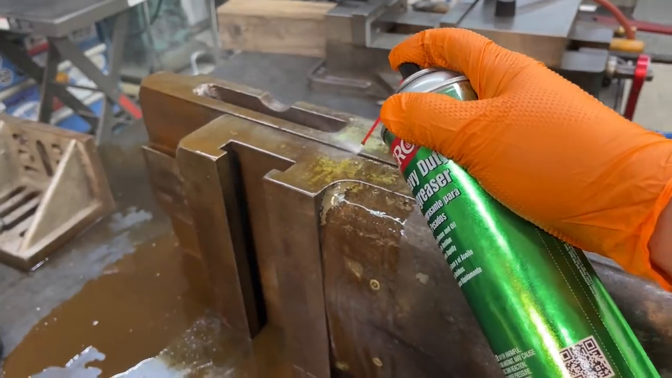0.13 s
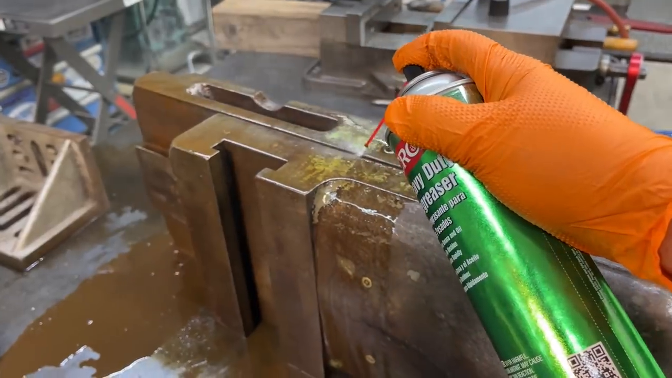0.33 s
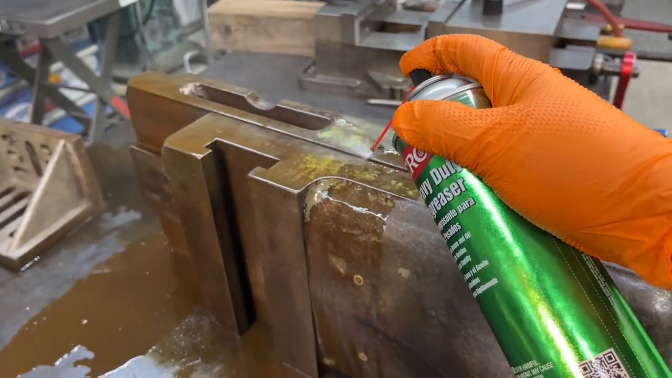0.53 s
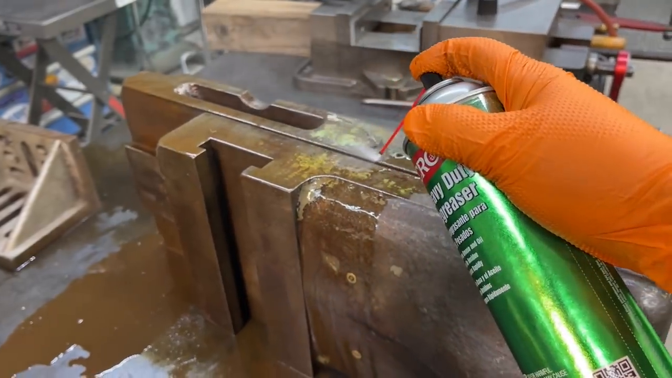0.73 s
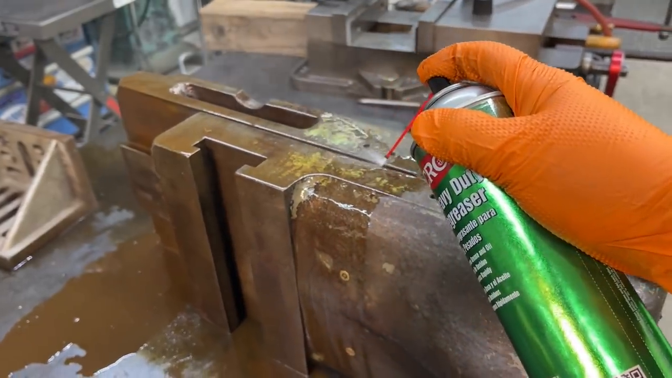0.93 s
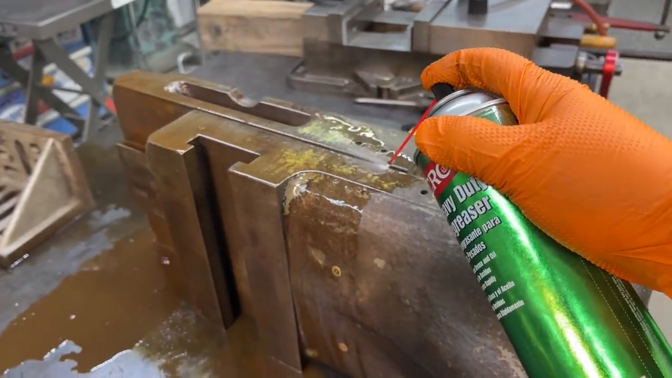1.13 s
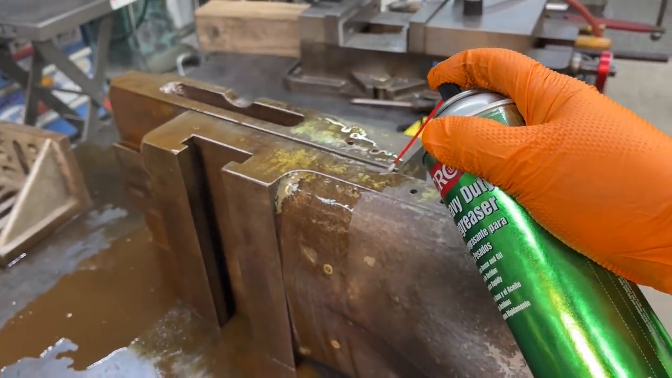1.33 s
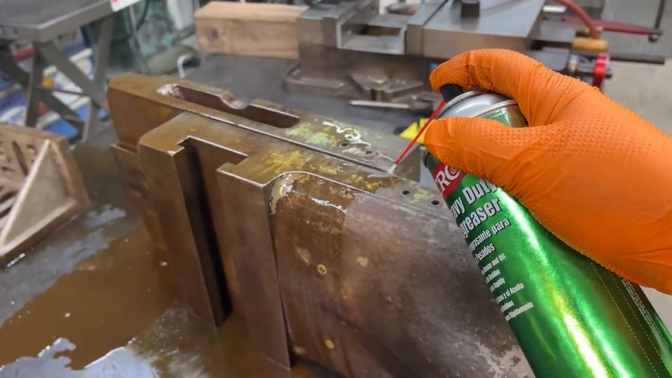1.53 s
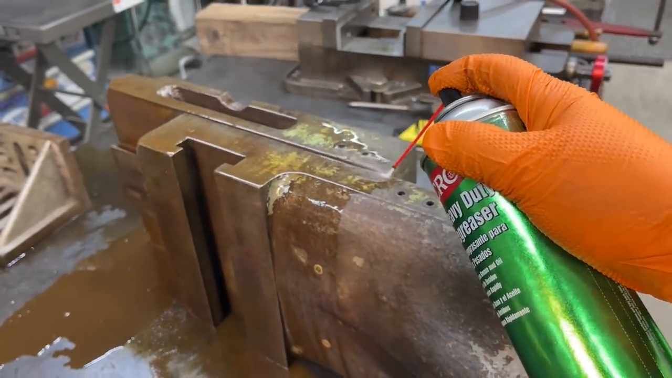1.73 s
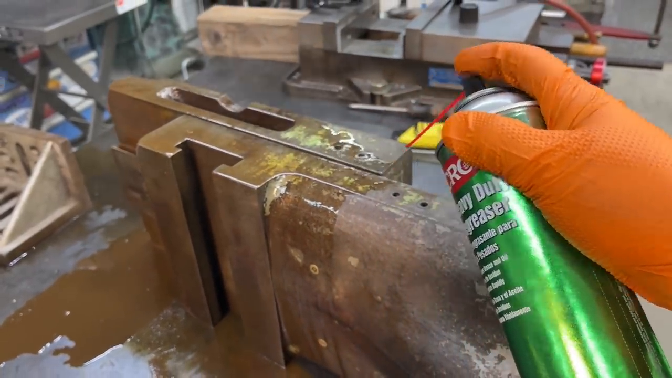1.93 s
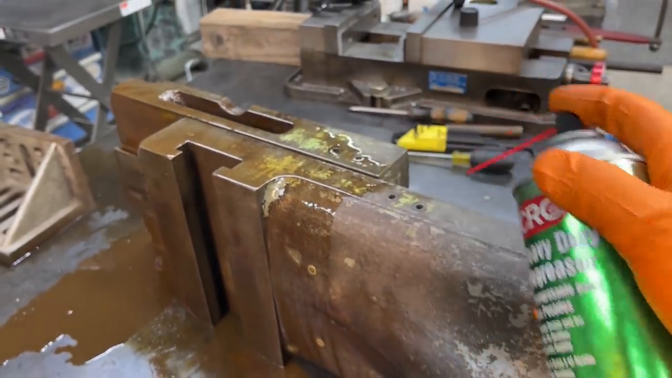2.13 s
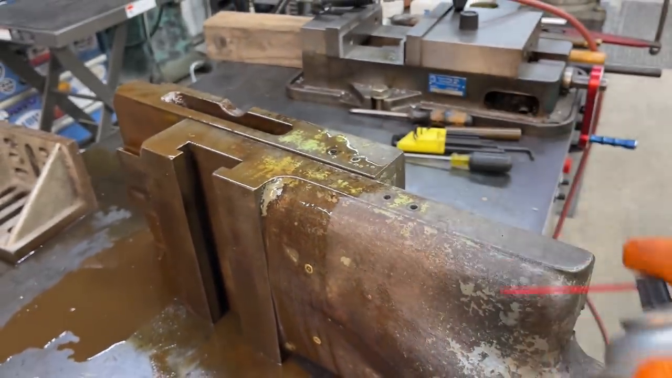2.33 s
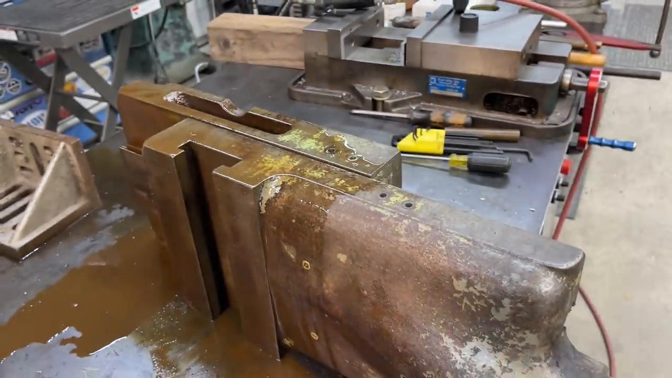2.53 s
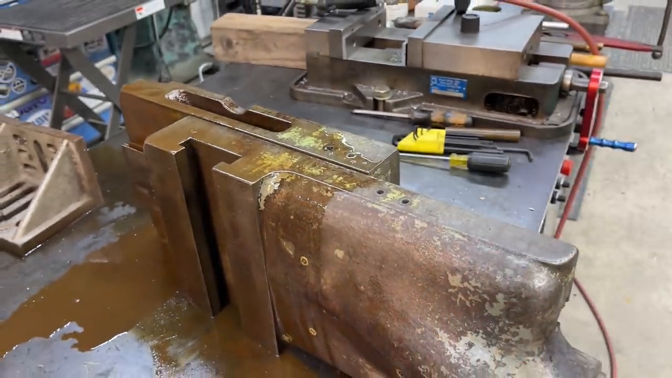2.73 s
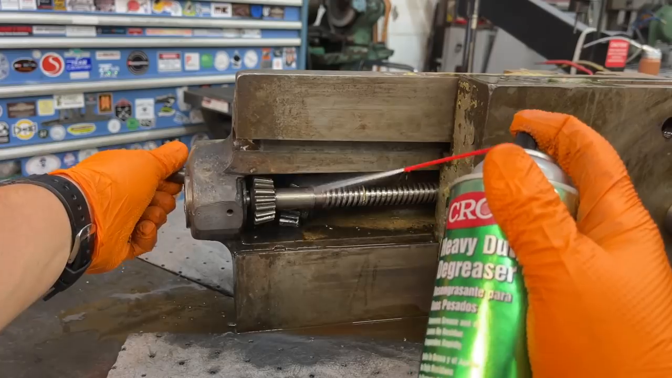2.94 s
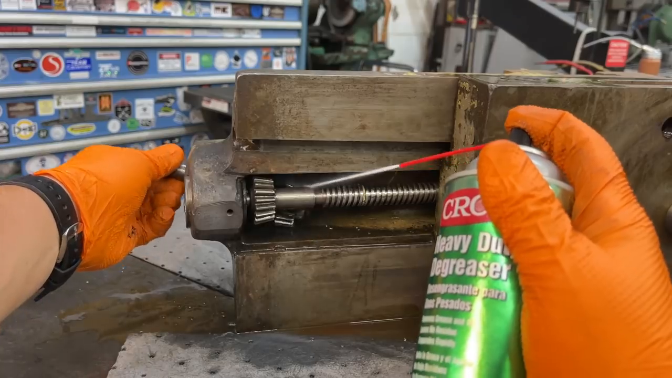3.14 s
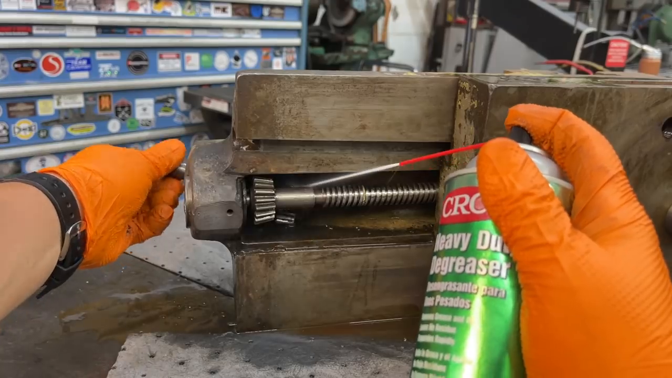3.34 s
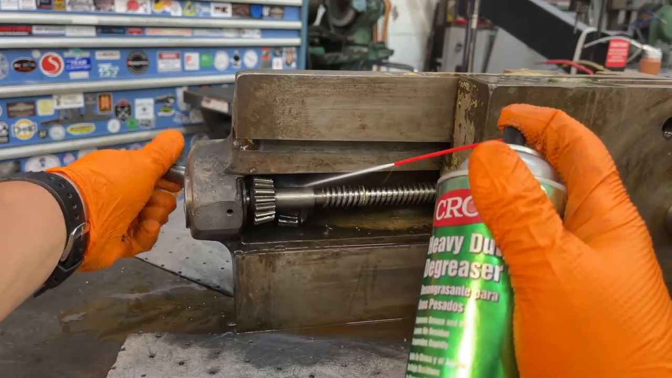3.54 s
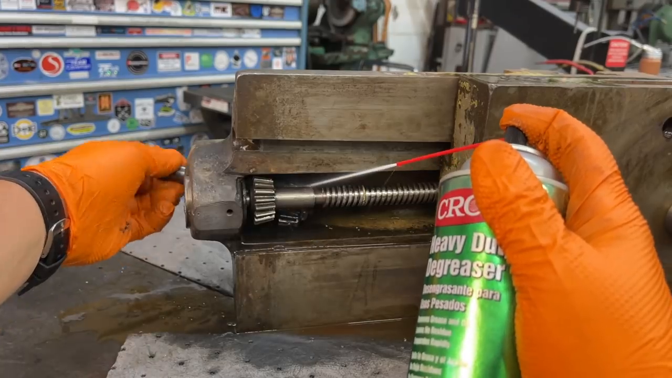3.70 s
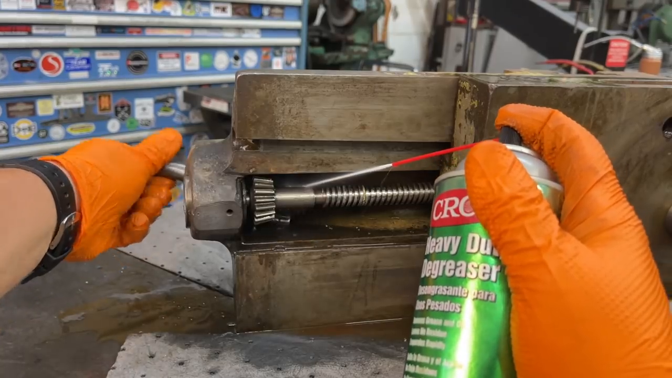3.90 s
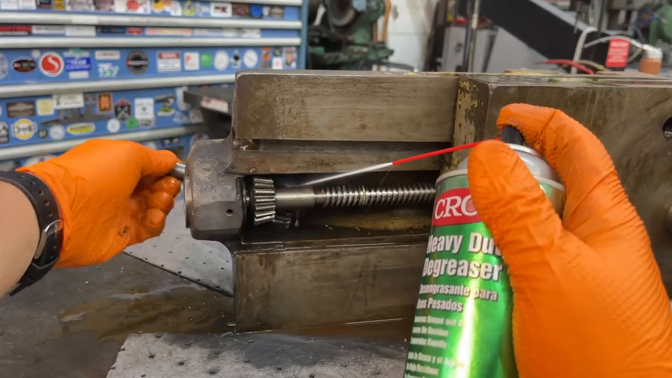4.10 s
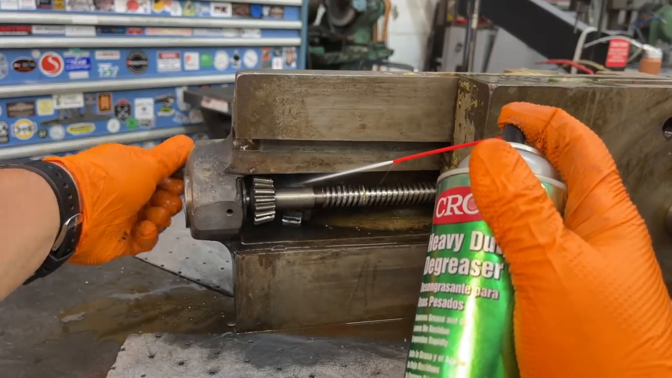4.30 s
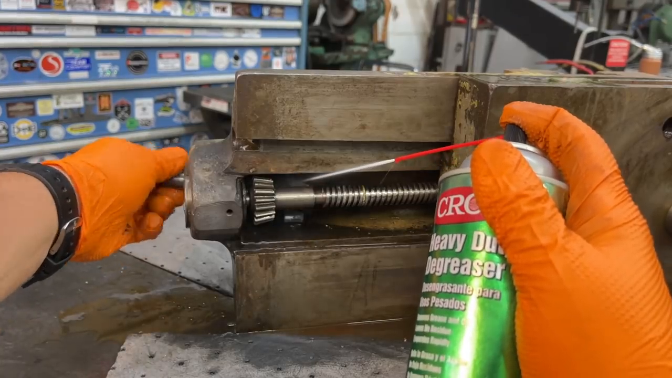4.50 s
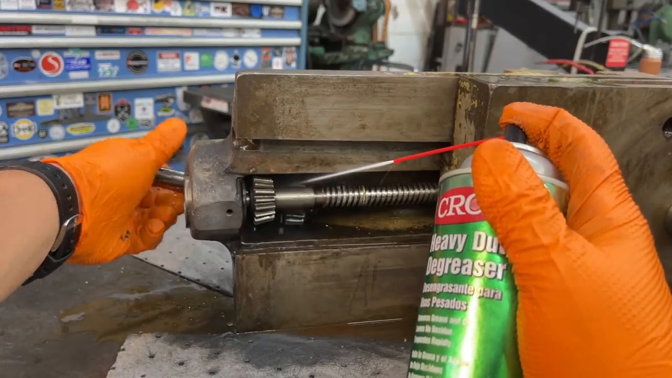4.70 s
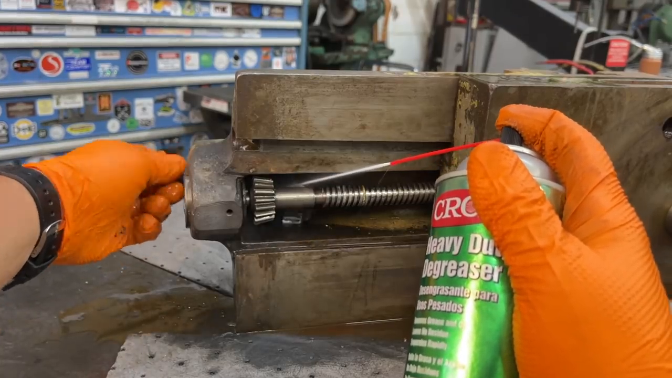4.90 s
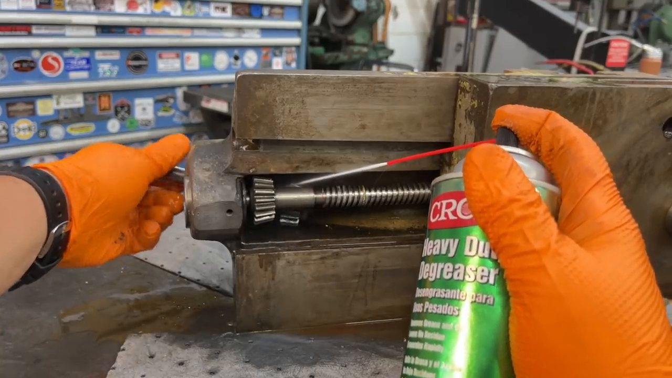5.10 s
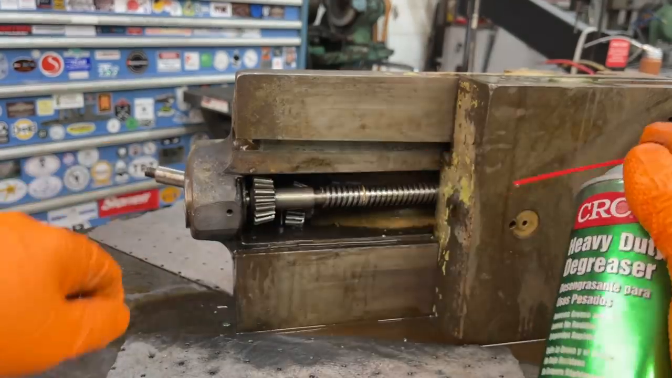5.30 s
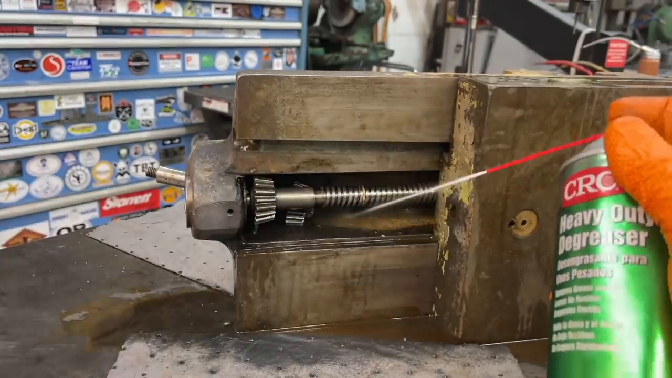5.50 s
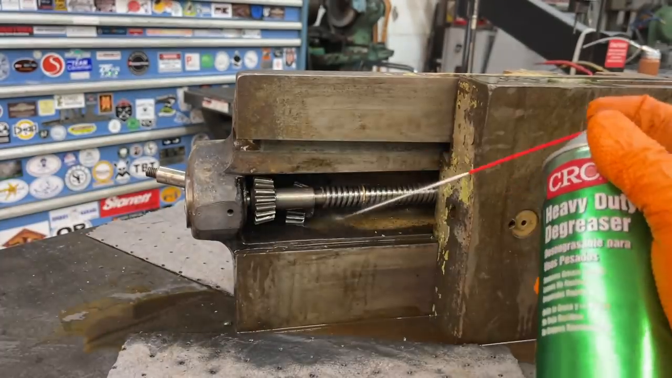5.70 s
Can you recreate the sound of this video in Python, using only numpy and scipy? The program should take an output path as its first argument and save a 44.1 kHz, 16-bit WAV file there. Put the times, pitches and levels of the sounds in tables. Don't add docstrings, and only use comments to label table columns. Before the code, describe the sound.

In a workshop, close to the microphone, an aerosol jet is already hissing against iron, splashing and shifting in tone. The valve shuts after about two seconds, leaving a short echo, tiny drips and faint stirring over a low rumble. An abrupt cut brings fuller hissing into a hollow while a crank turns a screw, with irregular grinding, knocks and short metallic rings. Another cut leaves only a close, bright spray.

```python
import sys
import numpy as np
from scipy import signal
from scipy.fft import rfft, irfft
from scipy.io import wavfile
from scipy.ndimage import uniform_filter1d

SR = 44100
rng = np.random.default_rng(int(sys.argv[2]) if len(sys.argv) > 2 else 0)


def nominal_scale(level):
    x = np.asarray(level, float) / 20
    return 10 ** x


def file_out(sig):
    cols = np.atleast_2d(sig).T
    lim = np.clip(cols, -1, 1)
    pcm = np.round(lim * 32767).astype(np.int16)
    wavfile.write(sys.argv[1], SR, pcm)


N = 253575
SHOTS = [0, 2.8, 5.247, 5.75]
STRIKE_RISE_S = .0004
PORT_LAG_S = .00012


def evened(x):
    return x / np.sqrt(np.mean(x ** 2) + 1e-20)


def smooth(x, size, axis=-1):
    return uniform_filter1d(uniform_filter1d(x, size, axis=axis), size, axis=axis)


def slow_wander(count, size):
    return evened(smooth(rng.standard_normal(count), size))


def patches(frames, bins, size):
    field = rng.standard_normal((frames, bins)).T
    field = uniform_filter1d(field, size[0], axis=0)
    return evened(uniform_filter1d(field, size[1], axis=1))


def bump(t, start, length):
    return np.exp(-((t - start) / length * 2 - 1) ** 4)


def held(t, start, length, db, rise, fall):
    early = np.subtract.outer(start, t)
    late = -np.subtract.outer(start + length, t)
    level = np.reshape(db, (-1, 1)) - rise * np.maximum(early, 0) - fall * np.maximum(late, 0)
    return level.max(0)


def read(points, hz):
    f, value = np.transpose(points)
    return np.interp(np.log(hz + 1), np.log(f + 1), value)


def sides(lean_db):
    return np.array([[lean_db], [-lean_db]]) / 2


def ports(db, alike, half_turns, lean_db):
    a, b, c, d = rng.standard_normal((db.shape[1], db.shape[0], 4)).T
    alike = np.clip(alike, 0, 1).reshape(len(db), -1)
    left = a + 1j * b
    right = alike * left + np.sqrt(1 - alike ** 2) * (c + 1j * d)
    right = right * np.exp(-1j * np.pi * half_turns)
    lean = nominal_scale(lean_db / 2)[:, None]
    size = 2 * (len(db) - 2)
    both = np.array([left * lean, right / lean]) * nominal_scale(db)
    return signal.istft(both, nperseg=size, noverlap=size * 3 // 4)[1]


def ring(x, modes):
    return sum(nominal_scale(db) * signal.lfilter(*signal.iirpeak(hz, hz / width, SR), x) for hz, width, db in modes)


def add(mix, s, sound):
    part = mix[:, round(s * SR):][:, :sound.shape[1]]
    part += sound[:, :part.shape[1]]


# frequency in Hz, density in dB per Hz.
AIR = [(40, -21), (60, 12), (100, 0), (160, -7.5), (250, -16), (400, -16.5), (700, -28), (1200, -28),
       (2000, -32), (3000, -41), (5000, -46.5), (8000, -44), (9800, -49), (11000, -66)]


def air():
    hz, t = np.fft.rfftfreq(2048, 1 / SR), np.arange(N) / SR
    colour = read([(20, -59.0), (32, -13)] + AIR + [(12000, -100.5)], hz)
    colour = colour[:, None] + np.zeros(N // 512 + 5)
    alike = read([(60, 0.86), (300, 0.62), (1100, 0.17), (3000, 0.35)], hz)
    both = nominal_scale(-53.5) * evened(ports(colour, alike, 0, 0 * hz)[:, :N])
    hiss = signal.sosfiltfilt(signal.butter(2, 280, "high", fs=SR, output="sos"), both)
    shot_db = np.array([3.5, 13, -2])[np.searchsorted(SHOTS[1:3], t)]
    stir_db = shot_db + .8 * slow_wander(N, 3000)
    stir_db += -5.5 * bump(t, 2.04, 0.19)
    stir_db += -19 * bump(t, 5.243, 0.087)
    shuffle = nominal_scale(4.0 * bump(t, 2.23, 0.3)) - 1
    return both + hiss * (nominal_scale(stir_db) - 1) + shuffle * ring(hiss, [(1274, 410, 2.4)])


# frequency in Hz, density in dB per Hz.
JET_TOP = [(300, -24), (600, -17), (1000, -5), (1600, -14), (2500, -9.5), (3400, -13), (4300, -9),
           (5500, -9.5), (6400, -7), (7400, -7.5), (9200, 0), (10800, -7), (12800, -25), (15600, -25)]
JET_HOLLOW = [(300, -17), (600, -6), (1000, -15), (1600, -10.5), (2500, -13.5), (3400, -12.5), (4300, -13),
              (5500, -6.5), (6400, -13), (7400, -5.5), (9200, 2), (10800, -4.5), (12800, -17.5),
              (15600, -22)]
JET_CLOSE = [(300, -12.5), (600, -5.5), (1000, -14), (1600, -10.5), (2500, -10.5), (3400, -10),
             (4300, -10.5), (5500, -4.5), (6400, -18), (7400, 1), (9200, 2), (10800, -1), (12800, -12.5),
             (15600, -18.5)]
# frequency in Hz, half turns.
TURN_TOP = [(0, 0), (1550, 0), (1720, -.2), (2150, -.36), (2420, -.93), (2560, -1), (2780, -.75),
            (2980, -.97), (3150, -1.06), (3450, -1.92), (4300, -2.03), (4480, -2.3), (5300, -2.9),
            (5550, -2.3), (6300, -2), (6900, -2.05), (7500, -2.3), (8600, -2), (8800, -1.95),
            (10120, -1.03), (10520, -.97), (11800, 0), (12700, 0), (13000, 1), (14200, 1), (14600, 2)]
TURN_SIDE = [(0, 0), (1500, .1), (3000, .2), (4300, .1), (5500, .4), (6400, .1), (7400, .2), (8100, .2),
             (8450, 0), (8700, -.05), (10100, -.97), (10520, -1.03), (11750, -2), (12700, -2), (13050, -3),
             (14300, -3), (15000, -4)]
# frequency in Hz, likeness from 0 to 1.
ALIKE_TOP = [(300, .8), (1800, .75), (2200, .8), (2480, .99), (2780, .88), (3050, .995), (3350, .7),
             (3550, .99), (4250, .99), (5300, .4), (6500, .95), (7600, .75), (8500, .99)]
ALIKE_HOLLOW = [(300, 0.51), (1200, 1), (2000, 0.56), (3000, 0.14), (4000, 0.58), (5500, 0.68),
                (6500, 0.94), (7400, 0.86), (8400, 0.41), (10000, 0.92)]
ALIKE_CLOSE = [(300, 0.99), (1200, 0.76), (2000, 0.93), (4300, 0.71), (5500, 0.71), (6500, 0.93),
               (7400, 0.52), (8400, 0.95), (10000, 0.91)]
# frequency in Hz, difference in dB.
LEAN_TOP = [(300, -0.5), (2000, 0), (4500, -2), (5500, -4.5), (6300, 1), (7300, -10.5), (8200, 3)]
LEAN_HOLLOW = [(300, 4), (1100, 0.5), (1800, -1), (3200, 9.5), (4000, 1), (5100, 7.5), (6300, 5), (7200, 6),
               (8200, 0)]
LEAN_CLOSE = [(300, 1), (1000, 2), (2000, 1.5), (5000, 1.5), (7000, 3), (8200, -0.5)]
# frequency in Hz, width in Hz, level in dB, change as the straw sweeps in dB per second.
HOLLOWS = [
    [(1814, 130, 14, -10), (3916, 170, 5, 0), (4700, 160, 7.5, -6.5), (2780, 200, -1.5, 0),
     (3200, 320, -1, 1)],
    [(1410, 130, 5.5, 2), (2130, 55, -0.5, 2.5)],
    [(6270, 320, 15.5, -2), (4340, 250, 8.5, -7), (8600, 230, 5, -3), (4940, 410, -4, 14),
     (920, 47, 16, -3)],
]
# time in seconds, jet in dB, gap from straw to iron in cm.
PRESSES = [
    [(0.0, -38.5, 8.3), (0.358, -38.5, 6.3), (0.446, -36.5, 4.6), (0.86, -35.5, 5.34), (0.968, -33.5, 5.9),
     (1.15, -33, 6.45), (1.546, -36.5, 4.5), (1.692, -36, 4.75), (1.82, -39.5, 4.1)],
    [(2.856, -48.5, 20), (2.905, -33.5, 7.3), (2.98, -33.5, 2.5), (3.04, -33.5, 4.6), (3.27, -33.5, 5.4),
     (3.9, -32, 7), (4.06, -31.5, 5.9), (4.64, -32, 5), (5.08, -31.5, 6.2)],
    [(5.275, -45, 10), (5.297, -35, 3.6), (5.347, -33, 5.4), (5.479, -34, 4.9), (5.713, -34, 6.1),
     (5.75, -32, 6.3)],
]


def spray(rows, colour, hollows, turn, alike, lean, end, slide, wet_db):
    s, jet_db, gap_cm = np.transpose(rows)
    count = round((end - s[0]) * SR)
    hz = np.fft.rfftfreq(512, 1 / SR)
    t = s[0] + np.arange(count // 128 + 5) * 128 / SR
    tone = read(colour, hz)[:, None]
    for f, width, db, change in hollows:
        tone = tone + np.outer(np.exp(-((hz - f) / width) ** 2), db + change * (t - s[0]))
    drift = 1.0 * patches(len(t), len(hz), size=(6, 40))
    streaks = 2.5 * patches(len(t), len(hz), size=(1, 150))
    spit = 0.61 * (rng.exponential(1, len(t)) - 1)
    splash_db = -11 * np.log2(np.maximum(gap_cm, .5) / 4.21)
    splash = np.outer(np.interp(hz, [1600, 2600], [1, 0]), np.interp(t, s, splash_db))
    coarse = 6 * np.exp(-(np.log2((hz + 1) / 3550) / 0.78) ** 2)
    sputter = np.outer(coarse, (t > s[-1] - 0.038) * (s[-1] < end))
    db = tone + sputter + splash + drift + streaks + spit

    sway_depth = .035 * np.interp(hz, [7400, 7600, 9600, 10000], [1, 0, 0, 2.5])
    sway = patches(len(t), len(hz), size=(8, 60)) * sway_depth[:, None]
    slid_hz = hz[:, None] + np.outer(hz * np.interp(hz, [2900, 3450], [1, 0]), slide * (t - s[0]))
    scattered = .09 * np.outer(hz < 3400, bump(t, .76, .62))
    half_turns = np.interp(slid_hz, *np.transpose(turn)) + sway
    jet = ports(db, read(alike, slid_hz) - scattered, half_turns, read(lean, hz))[:, :count]

    fine = s[0] + np.arange(count) / SR
    after = fine - s[-1]
    shutting_db = 30 * (np.maximum(after, 0) / 0.044) ** 2
    opening = np.minimum((fine - s[0] + (s[0] == 0)) / .007, 1)
    jet = evened(jet) * opening * nominal_scale(np.interp(fine, s, jet_db) + 3.0 - shutting_db)
    hush_db = -7 * np.clip((after - .22) / 0.11, 0, 1)
    fade = np.clip((end - fine) / 0.016, end >= N / SR, 1)
    return (jet + nominal_scale(wet_db + hush_db) * room(jet)) * fade


# frequency in Hz, time to fall 60 dB in seconds.
ROOM = [(300, 0.18), (2000, 0.53), (6000, 0.44), (9500, 0.37), (11000, 0.1)]


def room(x):
    hz, t = np.fft.rfftfreq(256, 1 / SR), np.arange(SR // 128) * 64 / SR
    alike = [(1000, 0.27), (2100, .3), (2400, .8), (3100, .8), (3600, .4), (6000, 0.8), (8200, 0.92)]
    tail = ports(-60 * t / read(ROOM, hz)[:, None], read(alike, hz), 0, 0 * hz)
    return signal.fftconvolve(x, tail / np.linalg.norm(tail[0]), axes=1)[:, :x.shape[1]]


# time in seconds, peak in dB, centre in Hz,
# left over right in dB.
TICKS = [(1.94, -52, 6460, -2), (2.25, -70, 7800, -5), (2.3311, -68, 6500, 1), (2.409, -61, 8900, -1.5),
         (2.417, -43.5, 6000, -8), (2.425, -55, 5500, -2), (2.431, -53, 6000, -4), (2.44, -48, 7800, -12),
         (2.447, -53, 8600, 4), (2.455, -63, 8000, -2), (2.4793, -58, 5000, -1), (2.498, -59, 1490, 10),
         (2.507, -60, 2200, -2.0), (2.517, -64, 7630, -4), (2.533, -64, 5800, -2), (2.591, -64, 4900, 3),
         (2.619, -64, 6400, -8), (2.625, -71, 8050, -3), (2.737, -70, 4000, 4), (2.737, -60, 900, 11),
         (2.802, -60, 3020, 5), (2.859, -29.5, 4100, 7), (2.862, -46, 8800, -2), (2.871, -27, 8800, -1),
         (2.87, -34, 2480, -6), (2.88, -27, 5170, 5), (2.89, -36, 6140, 2.5), (3.062, -29, 3460, 9),
         (3.072, -25, 4200, 14), (3.078, -25, 5200, 6), (3.087, -27.5, 3620, 9), (3.094, -33, 4400, 4),
         (5.072, -26, 3770, -3), (5.081, -27, 5660, 0), (5.226, -42, 260, 6), (5.443, -40.5, 181, -2),
         (5.534, -39.5, 278, 5), (5.269, -34, 4640, -9), (5.278, -38, 1780, -1), (5.2901, -23.5, 3380, 6),
         (5.298, -36, 7950, -6), (1.914, -54, 1100, -2), (1.94, -57, 1100, 6), (1.97, -60, 1150, 0),
         (1.979, -61, 1900, 0), (2.012, -60, 2500, 4), (2.9, -26.5, 3000, 2)]


def tick(peak_db, hz, lean_db):
    t = np.arange(4410) / SR
    t60 = 0.021 + 9.9 / hz
    puff = rng.standard_normal(len(t)) * nominal_scale(-60 * t / t60) * np.minimum(t / STRIKE_RISE_S, 1)
    around = [(hz, 0.84 * hz, 0)]
    puff = ring(ring(puff, around), around)
    puff = signal.sosfilt(signal.butter(8, 9900, fs=SR, output="sos"), puff)
    return nominal_scale(peak_db + sides(lean_db)) * puff / abs(puff).max()


def rubbed(modes, count, stray, span, even):
    rub = rng.standard_normal((3, count))
    rub = rub[0] + stray * rub[1:]
    body = ring(ring(rub, [(hz, 1.9 * width, 0) for hz, width, _ in modes]), modes)
    swell = smooth((body ** 2).mean(0), span)
    return evened(body / (abs(swell) + 1e-9) ** even)


# frequency in Hz, width in Hz, level in dB.
GRIND = [(283.7, 5, -5), (289.6, 26, 13), (312.6, 97, 1)]
SHAKE = [(102.4, 15.3, 5), (139, 37, -4.5), (174.4, 5.6, 0.5)]
SHAFT = [(972, 22, 19), (1048, 100, 17), (1033, 5, 13), (1105, 2.5, -17)]
# start in seconds, length in seconds, level in dB.
HUMS = [
    (2.831, 0.18, -45.5),
    (3.203, 0.02, -46.5),
    (3.416, 0.09, -42),
    (3.567, 0.08, -50),
    (3.83, 0.079, -66),
    (4.166, 0.087, -42.5),
    (4.978, 0.067, -43.5),
]
# start in seconds, length in seconds, effort in dB, lean on the bench in dB.
PUSHES = [(2.978, 0.057, -32, -5), (3.053, 0.052, -45.5, 8.5), (3.21, 0.019, -33, -14),
          (3.328, 0.1, -35, -5.5), (3.493, 0.013, -44, 4), (3.721, 0.05, -34, -7.5),
          (3.823, 0.027, -29.5, -5), (3.92, 0.07, -40, -5.5), (4.06, 0.028, -43.5, -5),
          (4.119, 0.098, -38.5, -4), (4.242, 0.022, -34, -9.5), (4.287, .02, -37, -3),
          (4.422, 0.014, -43.5, 5), (4.545, 0.02, -31, -13), (4.88, 0.046, -36, -21),
          (4.916, 0.026, -33, -2), (4.966, 0.011, -36, 0), (4.992, 0.021, -35, -1.5),
          (5.052, 0.011, -35.5, -3), (4.312, 0.03, -39, -11), (4.585, 0.082, -44.5, -2),
          (3.278, 0.039, -39, -1)]
# start in seconds, length in seconds, level in dB.
SLIPS = [(2.944, 0.007, -39), (2.959, 0.01, -40), (3.001, 0.012, -34), (3.029, 0.012, -41),
         (3.059, 0.007, -40), (3.075, 0.008, -40), (3.102, 0.008, -41), (3.205, 0.007, -36),
         (3.223, 0.008, -39), (3.271, 0.016, -38), (3.307, 0.01, -40), (3.327, 0.009, -31),
         (3.354, 0.018, -30), (3.399, 0.016, -33), (3.492, 0.01, -41), (3.708, 0.008, -40),
         (3.738, 0.01, -29), (3.763, 0.009, -28), (3.809, 0.009, -31), (3.827, 0.01, -27),
         (3.856, 0.01, -32), (3.877, 0.01, -38), (3.897, 0.009, -41), (3.923, 0.01, -44),
         (3.941, 0.01, -38), (3.98, 0.013, -38), (4.067, 0.01, -41), (4.118, 0.008, -34),
         (4.135, 0.009, -35), (4.155, 0.012, -32), (4.211, 0.009, -33), (4.24, 0.009, -32),
         (4.259, 0.009, -35), (4.282, 0.009, -41), (4.303, 0.008, -35), (4.326, 0.025, -37),
         (4.425, 0.008, -37), (4.505, 0.007, -42), (4.545, 0.01, -32), (4.582, 0.011, -39),
         (4.601, 0.012, -39), (4.853, 0.008, -44), (4.881, 0.012, -28), (4.899, 0.008, -34),
         (4.921, 0.011, -30), (4.938, 0.009, -30), (4.972, 0.007, -31), (4.991, 0.017, -32),
         (5.05, 0.011, -34), (5.087, 0.011, -44)]


def crank():
    t = np.arange(SHOTS[1], SHOTS[3], 1 / SR)
    start, length, effort_db, bench_db = np.transpose(PUSHES)
    slopes = (698, 234)
    push_db = held(t, start, length, effort_db, *slopes)
    lean_on_db = held(t, start, length, effort_db + bench_db, *slopes)
    loaded_db = held(t, np.array([2.93]), 5.08 - 2.93, 0, *slopes)
    slip_db = held(t, *np.transpose(SLIPS), 655, 480) + 0.1

    casting_db = np.maximum(slip_db, -55.5 + loaded_db)
    bench_level_db = np.maximum(lean_on_db, -48 + loaded_db / 10)
    shaft_db = np.maximum(push_db - 11, -46.5 + 1.15 * loaded_db)

    hum_hz = 204.4 + 2.3 * slow_wander(len(t), 6000)
    hum = np.sqrt(2) * np.sin(2 * np.pi * np.cumsum(hum_hz) / SR)
    out = hum * nominal_scale(held(t, *np.transpose(HUMS), 296, 127) + sides(2.2))
    out += rubbed(GRIND, len(t), .1, 200, .47) * nominal_scale(casting_db + sides(1.7))
    out += rubbed(SHAKE, len(t), .5, 2000, .35) * nominal_scale(bench_level_db + sides(3.6))
    shaft = rubbed(SHAFT, len(t), .6, 2000, .35)
    shaft[1] = np.roll(shaft[1], round(PORT_LAG_S * SR))
    out += shaft * nominal_scale(shaft_db + sides(4.0))
    return t[0], out * np.minimum((t - t[0]) / 0.0043, 1)


def burst(colour, t60, stray):
    t = np.arange(4096) / SR
    noise = rng.standard_normal((len(t), 3)).T
    noise = noise[0] + stray * noise[1:]
    noise = noise * nominal_scale(-60 * t / t60) * np.minimum(t / .0012, 1)
    out = irfft(rfft(noise) * nominal_scale(read(colour, np.fft.rfftfreq(len(t), 1 / SR))))
    return out * (t < t[-1] / 2) / abs(out).max()


# frequency in Hz, level in dB.
CRACK = [(200, -5), (350, 0), (600, 5), (900, -3), (1400, -11.5), (2000, -9), (3000, -10.5), (5000, -23),
         (10000, -65)]
EDGE = [(1500, -58), (2300, -19), (3500, -5.5), (5500, -15), (8000, -16), (11000, -55)]
# frequency in Hz, level in dB, time to fall 60 dB in seconds.
PARTS = [
    [(515, 0, .23), (545, -3, .06)],
    [(1055, -1, .38), (1102, -2.5, .36), (985, -6, .06)],
    [(1778, 0, .07), (1723, -3, .06)],
]
# time in seconds, blow in dB, then housing, shaft and gear in dB relative to the blow.
KNOCKS = [(2.898, -34.5, -28, -20, -12), (2.944, -18.5, -16.5, -18, -15.5), (2.956, -34, -29, -15, -7),
          (2.985, -15, -44, -21, -8.5), (3.003, -18, -18, -18.5, -9), (3.058, -22, -15, -24, -30),
          (3.095, -28.5, -23, -22, -7), (3.198, -30, -8, -15, -1.5), (3.32, -24.5, -15, -21, -35),
          (3.35, -21, -13, -34, -7), (3.488, -32, -3, -30, -9.5), (3.808, -22.5, -12, -11.5, -18),
          (3.976, -32, 0.5, -14, -20), (4.153, -27.5, -10.5, -15, -14), (4.18, -15.5, -26, -23, -17),
          (4.276, -28, -25, -17, -14), (4.302, -24, -7.5, -12, -30), (4.421, -34.5, -0.5, -11, -4),
          (4.504, -17, -44, -20, -8.5), (4.556, -16.5, -27, -26, -9.5), (4.6, -20, -46, -7, -8.5),
          (5.044, -27, -6, -17, -1.5), (3.0064, -20, -17, -28, -11), (2.974, -30, -17, -17, -11),
          (3.064, -25, -19, -22, -22), (3.209, -29, -21, -16, -14), (4.567, -27, -23, -15, -20)]


def knock(blow_db, housing_db, shaft_db, gear_db):
    out = np.zeros((2, SR // 3))
    for share_db, modes, lean_db in zip((housing_db, shaft_db, gear_db), PARTS, (3.5, 5.5, 3)):
        for hz, db, t60 in modes:
            out += mode(share_db + db, hz * rng.normal(1, .002), t60, lean_db)
    add(out, 0, nominal_scale(-2) * burst(CRACK, 0.092, 0.62))
    add(out, 0, nominal_scale(2 + 0.4 * gear_db) * burst(EDGE, 0.012, 1.0))
    out += mode(-14.5, 572 * rng.normal(1, .01), 0.064, 3.5)
    return nominal_scale(blow_db) * out


# time in seconds, level in dB, frequency in Hz, time to fall 60 dB in seconds.
PINGS = [
    (3.807, -31, 3060, .085),
    (4.6005, -28.5, 2457, .16),
    (3.324, -34, 1050, .07),
    (4.906, -37, 1055, .14),
    (4.195, -36, 2127, .06),
    (3.353, -38, 1448, .08),
]


def mode(db, hz, t60, lean_db=15.0):
    t = np.arange(SR // 3) / SR
    lag = np.array([[0], [PORT_LAG_S * (hz > 900)]])
    tone = np.sin(2 * np.pi * hz * (t - lag)) * np.minimum(t / STRIKE_RISE_S, 1)
    return nominal_scale(db - 60 * t / t60 + sides(lean_db)) * tone


def scene():
    mix = air()
    ends, slides, echoes_db = SHOTS[1:], (.08, 0, 0), (-11.5, -19.5, -16.5)
    colours = (JET_TOP, JET_HOLLOW, JET_CLOSE)
    turns = (TURN_TOP, TURN_SIDE, TURN_SIDE)
    likeness = (ALIKE_TOP, ALIKE_HOLLOW, ALIKE_CLOSE)
    leans = (LEAN_TOP, LEAN_HOLLOW, LEAN_CLOSE)
    for rows, *shot in zip(PRESSES, colours, HOLLOWS, turns, likeness, leans, ends, slides, echoes_db):
        add(mix, rows[0][0], spray(rows, *shot))
    ticks, turned, hits = np.zeros((3, 2, N))
    for s, *row in TICKS:
        add(ticks, s, tick(*row))
    add(turned, *crank())
    for s, *row in KNOCKS:
        add(hits, s, knock(*row))
    for s, *row in PINGS:
        add(hits, s, mode(*row))
    before_change = np.clip((SHOTS[2] - np.arange(N) / SR) / .012, 0, 1)
    mix += (turned + hits + nominal_scale(-12.5) * room(hits)) * before_change
    return mix + ticks + nominal_scale(-12.0) * room(ticks)


def joint_stereo(x, weak_db=-9.5, from_hz=1700, edge_hz=15830):
    hz, _, z = signal.stft([x[0] + x[1], x[0] - x[1]], SR, "cosine", nperseg=2048)
    edges = np.r_[np.geomspace(4, 200, 52), np.arange(212, 760, 12)]
    edges = np.unique(edges.astype(int))
    band = np.searchsorted(edges, np.arange(len(hz)))
    power = np.add.reduceat(abs(z) ** 2, np.r_[0, edges + 1], axis=1)[:, band]
    keep = (power > nominal_scale(2 * weak_db) * power[::-1]) | (hz < from_hz)[:, None]
    z = z * keep * (hz < edge_hz)[:, None]
    total, difference = signal.istft(z, SR, "cosine", nperseg=2048)[1][:, :N]
    return np.array([total + difference, total - difference]) / 2


def roll_off(x):
    return signal.sosfilt(signal.butter(12, 17110, fs=SR, output="sos"), x)


def record(dry):
    ceiling = .45
    mix = joint_stereo(ceiling * np.tanh(dry / ceiling))
    return roll_off(mix)


dry = scene()
out = record(dry)
file_out(out)
```